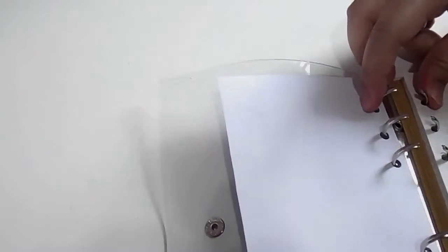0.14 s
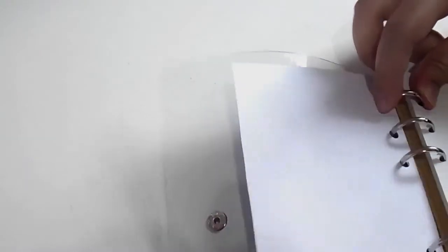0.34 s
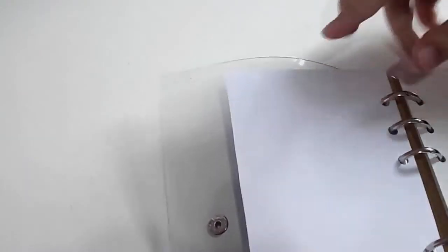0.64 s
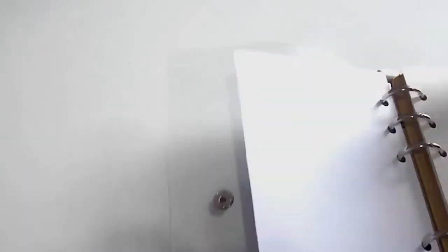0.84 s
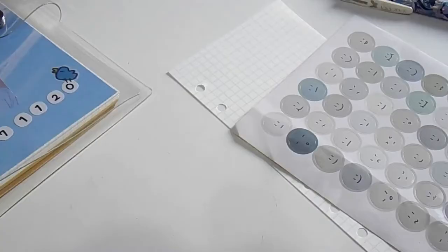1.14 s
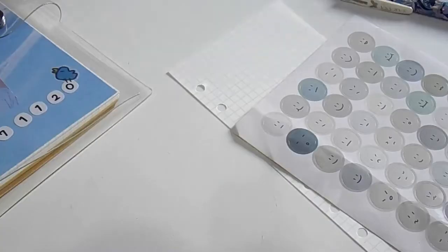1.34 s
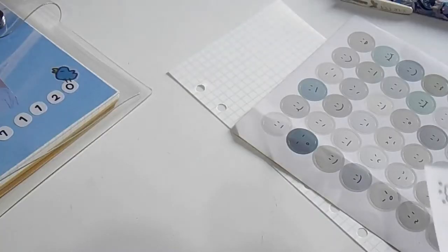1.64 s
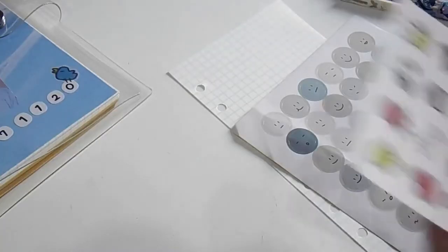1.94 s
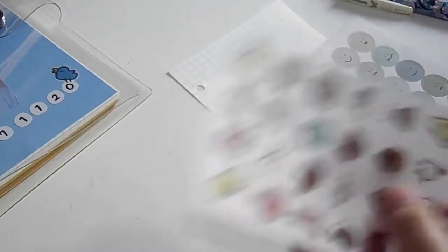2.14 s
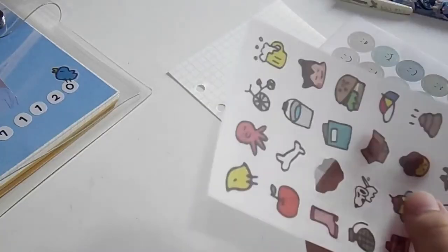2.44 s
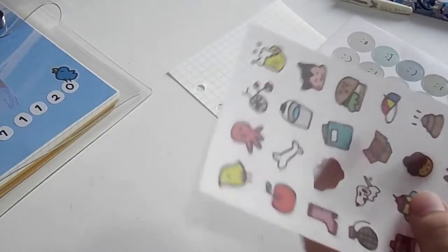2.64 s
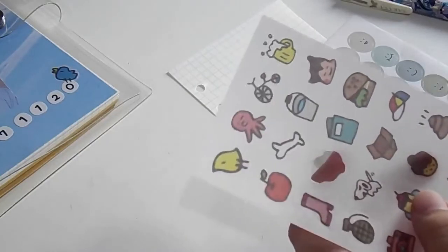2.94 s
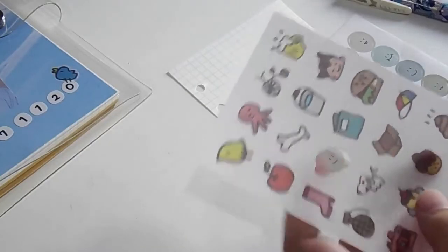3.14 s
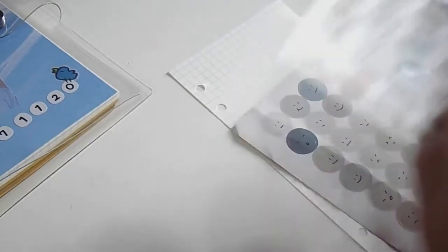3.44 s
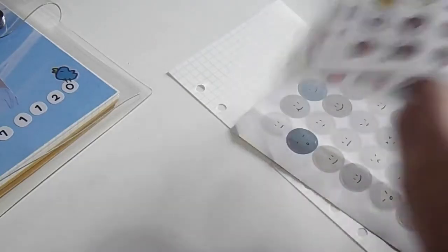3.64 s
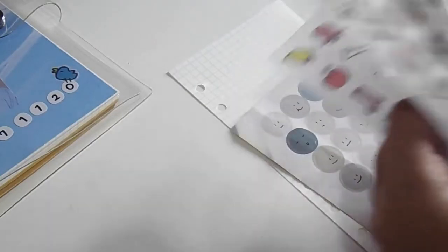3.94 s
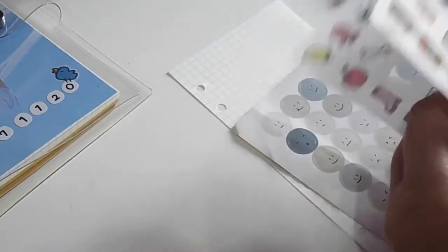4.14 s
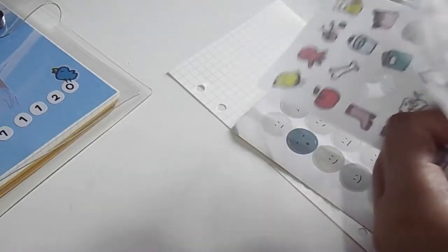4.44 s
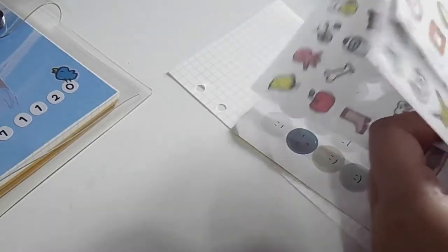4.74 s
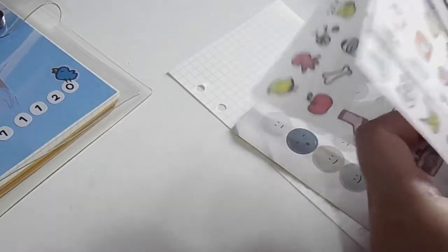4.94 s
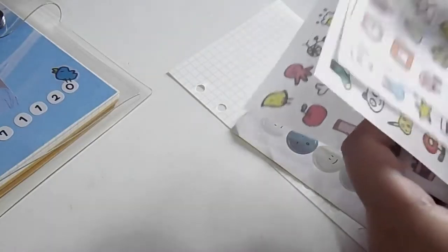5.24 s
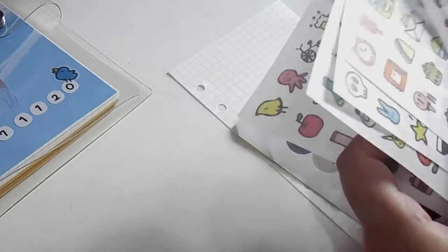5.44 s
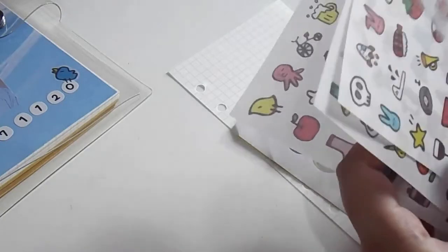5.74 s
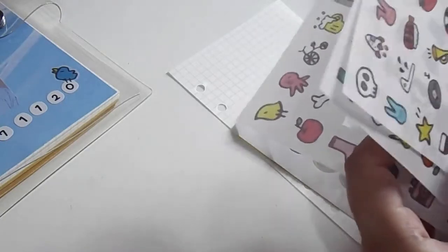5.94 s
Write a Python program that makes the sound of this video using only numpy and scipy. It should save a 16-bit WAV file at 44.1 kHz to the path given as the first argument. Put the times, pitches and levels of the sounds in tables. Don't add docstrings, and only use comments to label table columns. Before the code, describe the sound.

Close to the microphone in a bare, reflective room, a binder's steel rings snap shut almost at once, so loud it slightly overloads. The echo fades within half a second. Then, far quieter, hands shuffle thin plastic sheets: dry edge ticks, small flaps, soft knocks on the table and brief hissy slides, over steady faint hiss and hum.

```python
import sys
import numpy as np
from scipy import signal
from scipy.fft import rfft, irfft, next_fast_len
from scipy.io import wavfile

SR = 44100
rng = np.random.default_rng(int(sys.argv[2]) if len(sys.argv) > 2 else 0)


def makeup_ratio(level_db):
    decades = np.asarray(level_db, float) / 20
    return 10 ** decades


def master_out(mix):
    frames = np.transpose(np.atleast_2d(mix))
    ceiling = np.clip(frames, -1, 1)
    pcm = np.round(ceiling * 32767).astype(np.int16)
    wavfile.write(sys.argv[1], SR, pcm)


N = 268548

# start_s, rub_db
HAND_EFFORT = [(.7, -64.5), (1.0, -65.5), (1.3, -74), (1.65, -69.5), (1.92, -59.5), (2.35, -67),
               (2.8, -62.5), (3.04, -63.5), (3.35, -65.5), (3.72, -61), (4.08, -56.5), (4.3, -64.5),
               (4.5, -63.5), (4.8, -68.5), (5.03, -59.5), (5.3, -69.5), (5.6, -64), (6.09, -70)]


def unit(x):
    return x / np.sqrt(np.mean(x ** 2) + 1e-20)


def along(points, hz):
    f, v = np.transpose(points)
    return np.interp(np.log(hz + 1), np.log(f + 1), v)


def curves(rows):
    s, *cols = np.transpose(rows)
    return [np.interp(np.arange(N) / SR, s, c) for c in cols]


def filtered(x, response):
    m = next_fast_len(len(x) + SR // 4)
    return irfft(rfft(x, m) * response(np.fft.rfftfreq(m, 1 / SR)), m)[:len(x)]


def peak(f, hz, width_hz):
    return 1j * f * width_hz / (hz * hz - f * f + 1j * f * width_hz)


def causal(spectrum):
    log_gain = np.log(makeup_ratio(along(spectrum, np.fft.rfftfreq(8192, 1 / SR))) + 1e-6)
    cepstrum = irfft(log_gain)
    cepstrum = cepstrum * np.r_[1, 2 * np.ones(4095), 1, np.zeros(4095)]
    return irfft(np.exp(rfft(cepstrum)))[:4096]


def grainy(spectrum, grain_db, share):
    size_db = grain_db * np.minimum(rng.exponential(size=N), 3)
    spikes = makeup_ratio(size_db) * (rng.random(N) < share)
    noise = rng.standard_normal(N) * (1 + spikes)
    return unit(filtered(noise, lambda f: makeup_ratio(along(spectrum, f))))


def swell(start_s, length_s):
    skew, soft = 1.1, 1.7
    u = np.clip((np.arange(N) / SR - start_s) / length_s, 0, 1)
    return np.abs(np.sin(np.pi * u ** skew)) ** soft, u


def tail(rise_s, longer=1):
    # pitch_hz, t60_s
    room_decay = [(150, 0.45), (400, 0.36), (1000, .5), (3000, 0.45), (6000, 0.44), (8500, .4),
                  (11000, .38), (16000, 0.24)]
    hz, t, z = signal.stft(rng.standard_normal(SR), SR, nperseg=256)
    t60 = longer * along(room_decay, hz)[:, None]
    answer = signal.istft(z * makeup_ratio(-60 * t / t60), SR, nperseg=256)[1][:SR]
    answer = answer * (1 - np.exp(-np.arange(SR) / SR / rise_s))
    return answer / np.linalg.norm(answer)


def background():
    # pitch_hz, level_db per Hz
    hiss_colour = [(20, -60), (40, -29), (70, -18.5), (120, -13.5), (250, -7.5), (420, -3), (650, -1.5),
                   (1200, -5), (2500, -8.5), (7000, -15), (10000, -14.5), (15500, -20.5), (15900, -24),
                   (16300, -60)]
    # pitch_hz, level_db per Hz
    hum_colour = [(80, -31.5), (200, -9.5), (350, -4), (550, 5), (900, 0.5), (1500, -12), (3000, -21),
                  (6000, -61.5)]
    # pitch_hz, level_db rms
    mains_lines = [(100, -85.5), (148, -82), (198, -84.5)]
    # start_s, length_s, level_db
    boom = (0.23, .3, -48.5)
    far_hum_db, follows, calm_db = -62, 0.22, -65

    hands_db, = curves(HAND_EFFORT)
    steady = makeup_ratio(far_hum_db + follows * (hands_db - calm_db))
    hum_gain = np.hypot(steady, makeup_ratio(boom[2]) * swell(*boom[:2])[0])
    hum = hum_gain * makeup_ratio(-4.5) * grainy(hum_colour, grain_db=2.5, share=.003)
    hiss = makeup_ratio(-60.5) * grainy(hiss_colour, grain_db=1, share=0)
    mains = np.zeros(N)
    for hz, db in mains_lines:
        mains += makeup_ratio(db) * unit(filtered(rng.standard_normal(N), lambda f: peak(f, hz, 17) ** 2))
    return hiss + hum + mains


def snap():
    # start_s, level_db, edge_t60_s
    contacts = [
        (.20372, -3, .004),
        (.20620, -4, .001),
        (.20655, 1, .002),
        (.20690, 1, .002),
        (.20724, -1, .004),
    ]
    # delay_s after the main contact, level_db
    walls = [(.0055, -13), (.0087, -5.5), (.0108, -6), (.0128, 7), (.016, -10), (.020, -7), (.0213, 0),
             (.023, -13), (.0285, -5), (0.035, -10), (.037, -6.5), (.044, -8)]
    # pitch_hz, level_db per Hz
    spine_colour = [(60, -70.5), (230, -37), (310, -12.5), (650, -20), (950, -7.5), (1200, -15.5),
                    (1850, -17.5), (2500, -3.5), (3000, 1), (3400, -6), (3950, -16.5), (7000, -20),
                    (15000, -22.5), (16200, -27.5)]
    # pitch_hz, width_hz, lift_db
    ring_modes = [(4700, 400, 3.5), (5800, 610, 8.5), (6400, 260, 4), (7614, 580, 3), (9800, 900, 3.5),
                  (11350, 900, 3), (14590, 1200, 3.5)]

    blows, edges, t = np.zeros(N), np.zeros(N), np.arange(150) / SR
    for s, db, t60 in contacts:
        at = round(s * SR)
        blows[at] += makeup_ratio(db)
        edges[at:][:len(t)] += makeup_ratio(db - 2 - 60 * t / t60) * rng.standard_normal(len(t))
    main = round(contacts[1][0] * SR)
    for s, db in walls:
        smear = np.r_[1, .45 * rng.standard_normal(len(t) - 1) * makeup_ratio(-60 * t[1:] / .004)]
        blows[main + round(s * SR):][:len(t)] += makeup_ratio(db - 2) * smear
    blows[main:][:SR] += makeup_ratio(12.5) * tail(rise_s=0.024)
    blows[main - 100:][:SR] += makeup_ratio(2.0) * tail(rise_s=0.0012, longer=.06)
    blows[main:][:SR] += makeup_ratio(-6.5) * tail(rise_s=.05, longer=1.9)
    for hz, width_hz, db in ring_modes:
        blows = filtered(blows, lambda f: 1 + (makeup_ratio(db) - 1) * peak(f, hz, width_hz))
    steel = causal(spine_colour)
    struck = signal.fftconvolve(blows, steel / steel.max())[:N]
    return makeup_ratio(-2.0) * struck + filtered(edges, lambda f: peak(f, 10000, 32000) ** 2)


def taps():
    # start_s, peak_db, centre_hz, width as share of centre
    edge_ticks = [(.9235, -38, 1150, 1.07), (.999, -46, 7000, 2.1), (1.052, -48, 7060, 2),
                  (1.389, -37, 2980, 3), (1.849, -51, 11000, 1), (1.975, -44, 7020, 1.74),
                  (2.041, -46, 3960, 1.25), (2.052, -50, 8000, 1.7), (2.0753, -39.5, 6000, 0.94),
                  (2.485, -46, 10030, 1.5), (2.501, -42, 11000, 1.6), (2.51, -47, 3000, 2.2),
                  (2.6005, -39.5, 4530, 2.1), (2.601, -35, 2100, 1.7), (2.8773, -34.5, 5800, .55),
                  (2.8814, -34.5, 6870, 0.68), (2.9802, -33, 2170, 1.9), (3.473, -49, 8000, 2),
                  (3.945, -42, 7000, 2.3), (4.15, -48, 3000, 1.5), (4.444, -43.5, 5020, 1.4),
                  (4.495, -44, 4960, 1.6), (4.512, -45, 5100, 1.52), (4.058, -34, 2390, 1.3),
                  (5.005, -44, 3000, 1.95), (5.059, -37, 2190, 0.86), (5.457, -40, 2380, 0.74),
                  (5.47, -46.5, 2490, 1.55), (5.72, -47, 2500, 2.1), (5.80, -48, 11000, 1.1)]
    # start_s, peak_db, centre_hz, width
    sheet_flaps = [(.212, -19.5, 493, .5), (.414, -43, 12500, .6), (1.408, -43, 7970, 1.6),
                   (1.408, -45, 3270, 1), (1.735, -42, 2003, 1.8), (2.226, -46, 2600, 1.2),
                   (2.376, -49.5, 8000, 0.75), (2.602, -39, 2500, 0.51), (2.605, -35, 1640, 1.03),
                   (2.62, -40.5, 1670, 1.2), (2.643, -45, 1490, 0.77), (2.872, -45.5, 756, .8),
                   (2.982, -43, 2470, 0.82), (2.99, -39.5, 1690, .9), (3.013, -43, 1800, 0.78),
                   (3.01, -46, 4050, 3.5), (3.498, -43.5, 8000, 2.3), (3.507, -41, 1760, 1.1),
                   (3.635, -47, 4140, 0.54), (3.655, -45.5, 1780, .4), (3.737, -47, 1573, .55),
                   (3.985, -51, 4700, .35), (4.026, -41.5, 2450, 1.6), (4.17, -53, 331, 0.45),
                   (4.115, -44.5, 1990, 1.6), (5.135, -53, 900, .5), (5.38, -50, 950, .6),
                   (5.683, -50, 2297, 0.96)]
    # start_s, peak_db
    table_knocks = [(.925, -49), (1.545, -56), (1.735, -55), (2.041, -54.5), (2.601, -47.5), (2.872, -44),
                    (3.01, -49), (3.507, -59), (4.027, -57), (4.059, -48.5), (5.005, -44), (5.058, -43),
                    (5.38, -58.5), (5.456, -42), (5.72, -58)]
    tick_s, flap_s, knock_s = 0.00079, 0.0036, 0.0037

    out, t = np.zeros(N + 2 * SR), np.arange(SR // 10) / SR

    def flick(length_s):
        return t / length_s * np.exp(-t / length_s)

    hits = [(*row, flick(tick_s)) for row in edge_ticks]
    hits += [(*row, flick(flap_s)) for row in sheet_flaps]
    hits += [(s, db, 490, .79, np.exp(-t / knock_s)) for s, db in table_knocks]
    for s, db, hz, breadth, shape in hits:
        body = lambda f: peak(f, hz, breadth * hz) ** 2
        burst = filtered(shape * rng.standard_normal(len(t)), body)
        burst = makeup_ratio(db) * burst / np.abs(burst).max()
        space = makeup_ratio(3.5) * tail(rise_s=0.0035, longer=0.43) + makeup_ratio(-1.5) * tail(rise_s=0.019)
        space = space[:SR // 2]
        share = np.linalg.norm(burst) / np.linalg.norm(filtered(space, body))
        answer = share * filtered(space, lambda f: body(f) / (1 + 1j * f / 3000))
        at = round(s * SR)
        out[at:][:len(t)] += burst
        out[at:][:len(space)] += answer
    return out[:N]


def slides():
    # start_s, length_s, hiss_db, rub_db
    strokes = [(0.924, 0.0378, -63, -57), (1.037, 0.13, -60, -57.5), (1.111, 0.076, -58, -56),
               (1.395, 0.033, -56, -49), (1.96, .04, -66, -55), (2.18, .07, -59.5, -64),
               (2.462, 0.0694, -59, -58), (2.56, .14, -61, -67), (2.717, 0.125, -57.5, -71),
               (2.868, 0.116, -57.5, -56), (2.986, 0.046, -60, -68), (2.972, .14, -72, -63.5),
               (3.465, .07, -55, -61), (3.6, 0.097, -60, -57), (3.687, 0.082, -54.5, -60),
               (3.892, .05, -56, -56.5), (3.994, 0.12, -65, -60), (4.205, .09, -56, -65),
               (4.272, .045, -58, -61), (4.363, 0.081, -56, -65), (4.36, 0.23, -57.5, -65),
               (4.47, 0.056, -66, -70), (4.574, 0.077, -46, -58), (4.77, .075, -60, -62),
               (4.99, .05, -57, -56), (5.43, .12, -58.5, -60), (5.48, 0.2, -57, -67),
               (5.71, .065, -57.5, -59.5), (5.885, .08, -58.5, -59.5)]
    # pitch_hz, level_db per Hz
    rub_colour = [(60, -48), (700, -8), (1200, -2.5), (2000, -5.5), (3500, -8), (6000, -9), (9000, -22),
                  (14000, -56)]
    # pitch_hz, level_db per Hz
    fine_colour = [(300, -58), (2350, -28), (4000, 0.5), (5100, -13), (5870, -2), (6940, -3), (12600, -2),
                   (16000, -8)]

    hands_db, = curves(HAND_EFFORT)
    moving = np.clip((np.arange(N) / SR - .62) / 0.105, 0, 1)
    hiss_gain, rub_gain = np.zeros(N), np.zeros(N)
    for s, length_s, hiss_db, rub_db in strokes:
        gain = swell(s, length_s)[0]
        hiss_gain += gain * makeup_ratio(hiss_db)
        rub_gain += gain * makeup_ratio(rub_db)
    rub_gain = np.hypot(rub_gain, moving * makeup_ratio(hands_db))
    hiss_gain = np.hypot(hiss_gain, moving * makeup_ratio(hands_db - 7.5))
    rub = rub_gain * makeup_ratio(-3.5) * grainy(rub_colour, grain_db=4.0, share=.02)
    hiss = hiss_gain * makeup_ratio(-1.5) * grainy(fine_colour, grain_db=4.5, share=0.018)
    return rub + hiss


def squeak():
    # start_s, length_s, level_db, from_hz, to_hz
    whistles = [(4.21, .115, -57, 5950, 6400), (4.33, .16, -54.5, 4300, 3710),
                (4.42, .2, -54.5, 3720, 4236), (4.58, .08, -53, 5200, 5000),
                (4.475, .065, -57.5, 6350, 6330), (5.49, .17, -61, 10000, 13000),
                (5.57, .09, -63, 13500, 11980), ]
    # start_s, length_s, level_db, from_hz, to_hz
    chirps = [(4.76, 0.044, -59, 4120, 4050), (4.81, .035, -56, 3600, 2400), (3.3, .04, -60, 1800, 1780),
              (3.73, 0.075, -60, 2300, 2100)]
    out = np.zeros(N)
    for table, width_hz in [(whistles, 900), (chirps, 150)]:
        slow = unit(filtered(rng.standard_normal(N), lambda f: 1 / (1 + (f / width_hz) ** 2)))
        for s, length_s, db, from_hz, to_hz in table:
            gain, progress = swell(s, length_s)
            pitch_hz = from_hz + (to_hz - from_hz) * progress
            out += makeup_ratio(db) * gain * slow * np.sin(2 * np.pi * np.cumsum(pitch_hz) / SR)
    return out


def scene():
    sheets = slides() + squeak()
    sheets = makeup_ratio(-1) * sheets + makeup_ratio(-9) * signal.fftconvolve(sheets, tail(rise_s=0.0062))[:N]
    return (background() + snap() + taps() + sheets)[None]


def band_limit(x):
    return signal.sosfilt(signal.butter(12, 16180, fs=SR, output="sos"), x)


def record(dry):
    clipped = dry[0] / (1 + np.abs(dry[0]) ** 8) ** (1 / 8)
    clipped = filtered(clipped, lambda f: np.clip((16300 - f) / 500, 0, 1))
    t = np.arange(N) / SR
    starved = np.clip(np.minimum(t - .186, .2 - t) / .001, 0, 1)
    dull = filtered(clipped * (t < .203), lambda f: 1 / (1 + (f / 900) ** 8))
    mix = clipped * (1 - starved) + dull * starved
    return band_limit(mix[None])


dry = scene()
out = record(dry)
master_out(out)
```